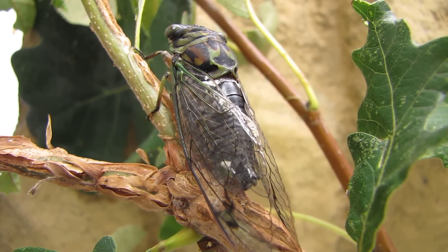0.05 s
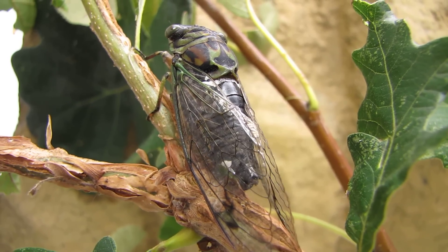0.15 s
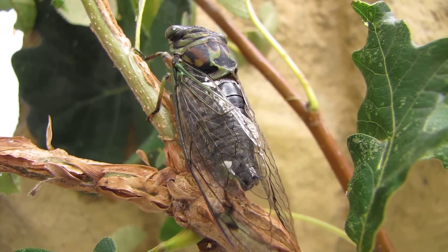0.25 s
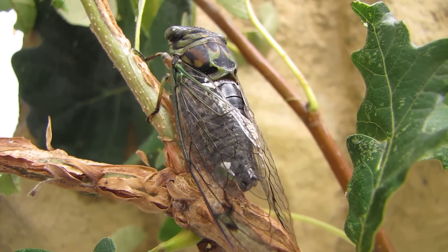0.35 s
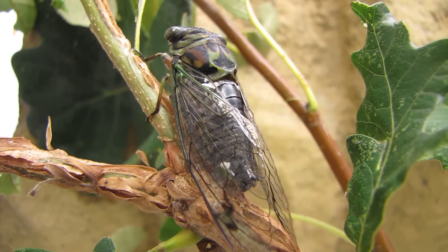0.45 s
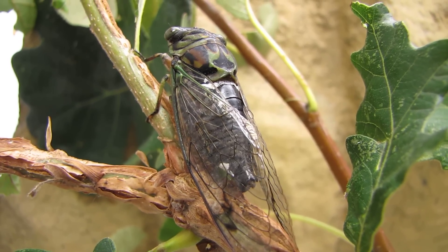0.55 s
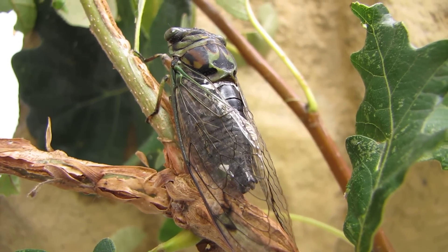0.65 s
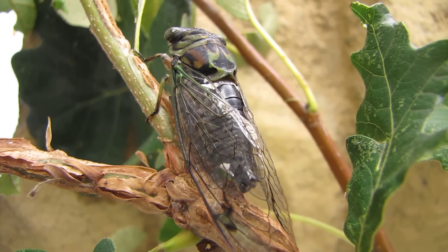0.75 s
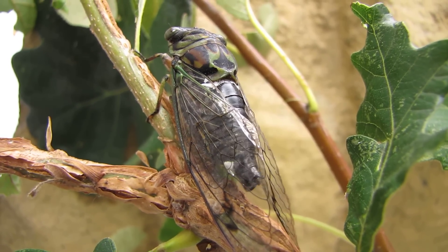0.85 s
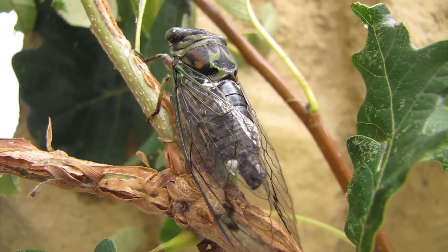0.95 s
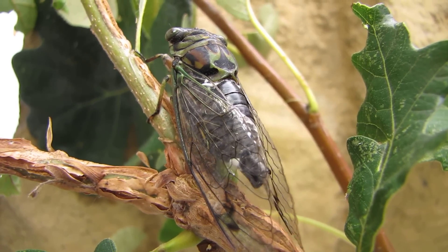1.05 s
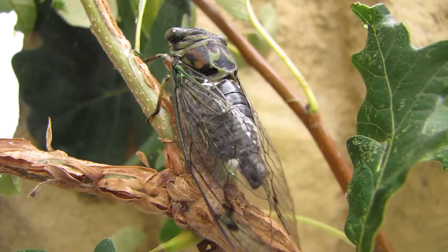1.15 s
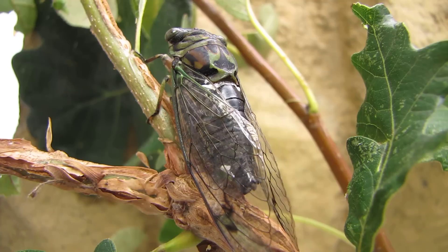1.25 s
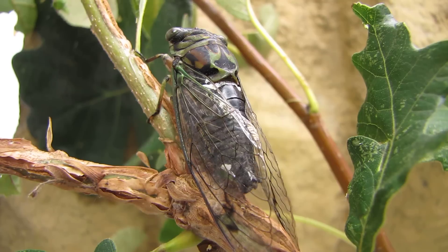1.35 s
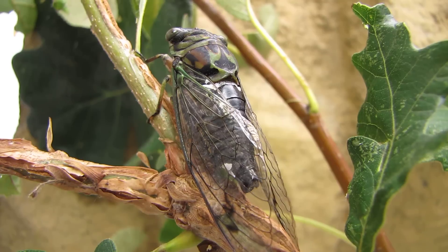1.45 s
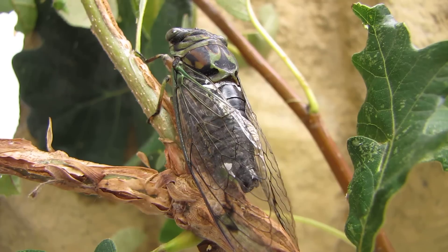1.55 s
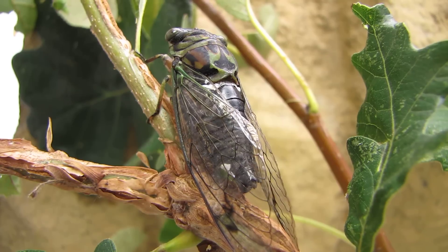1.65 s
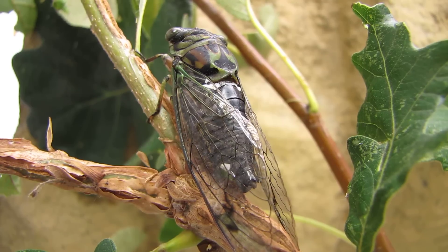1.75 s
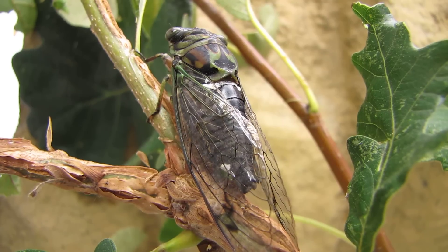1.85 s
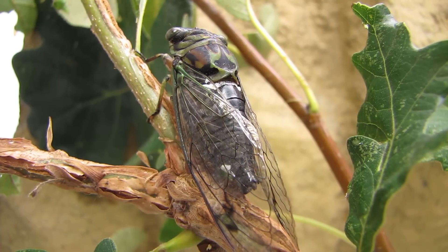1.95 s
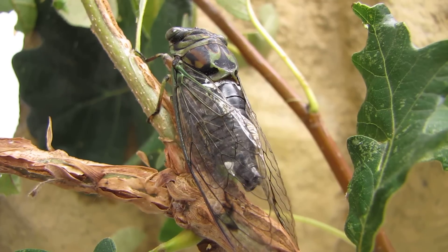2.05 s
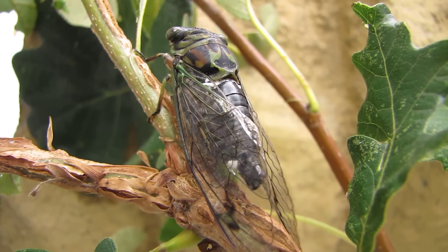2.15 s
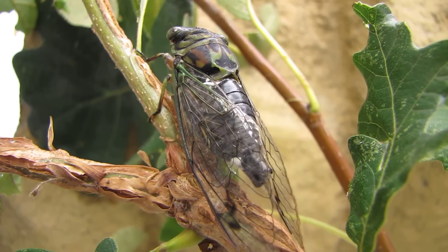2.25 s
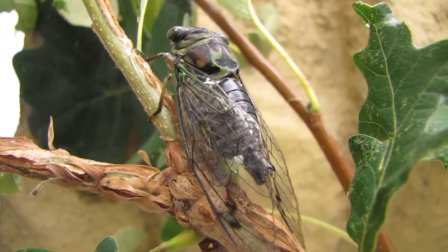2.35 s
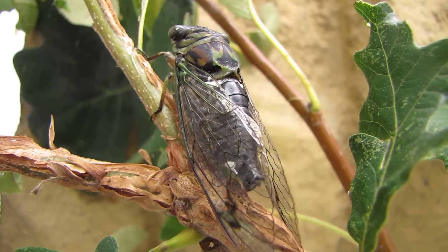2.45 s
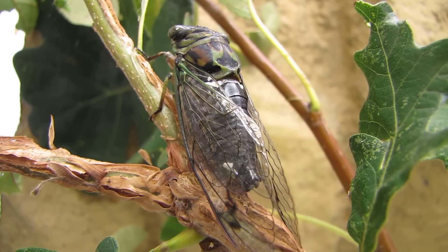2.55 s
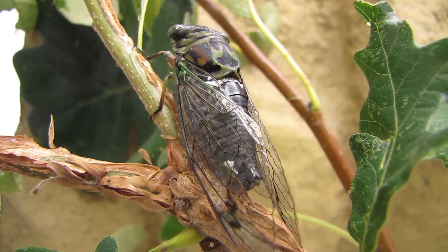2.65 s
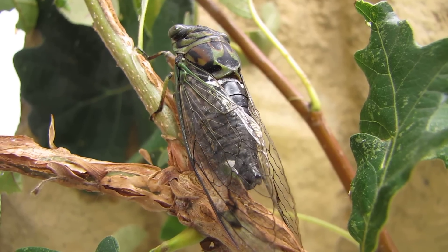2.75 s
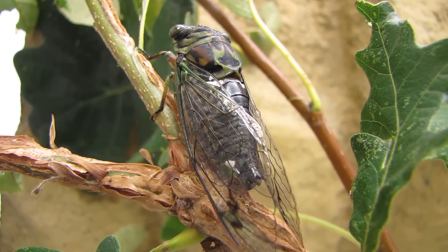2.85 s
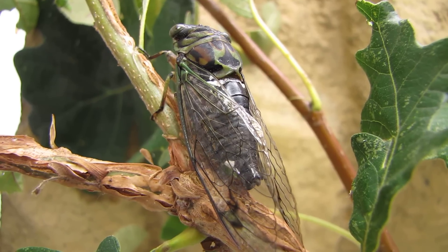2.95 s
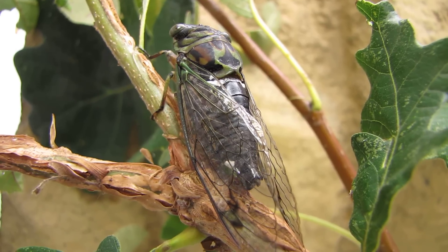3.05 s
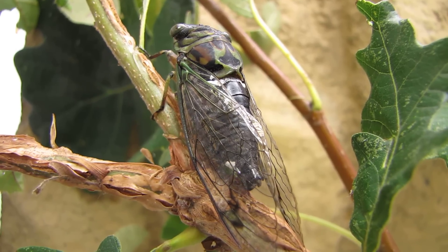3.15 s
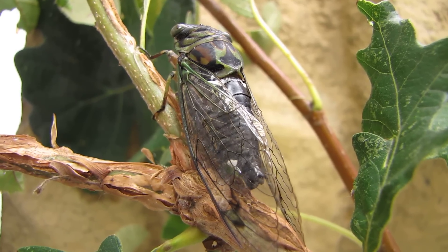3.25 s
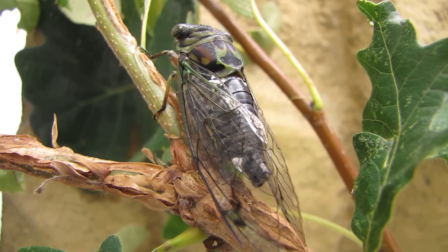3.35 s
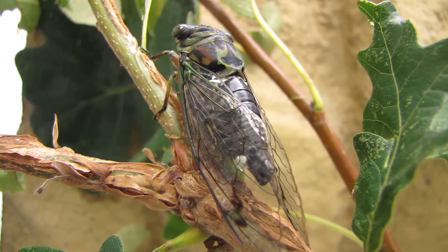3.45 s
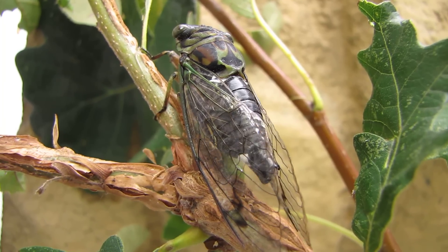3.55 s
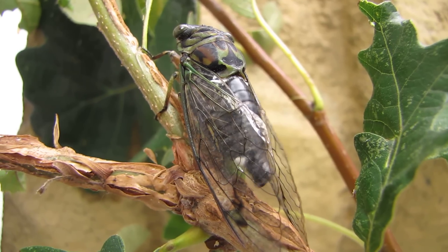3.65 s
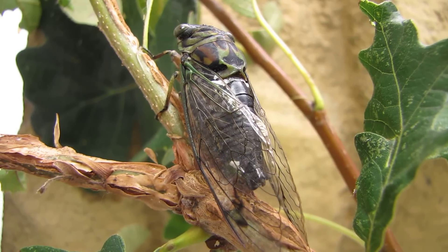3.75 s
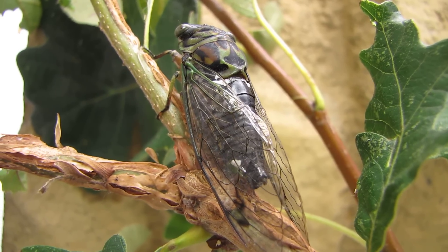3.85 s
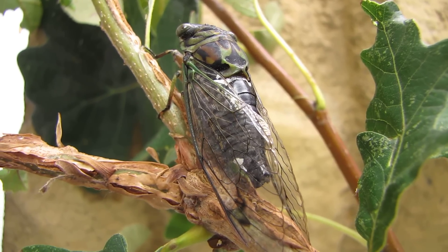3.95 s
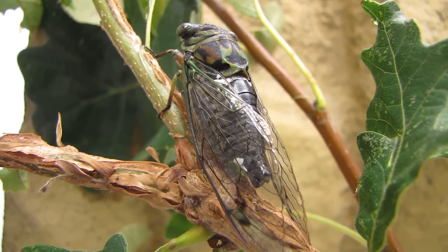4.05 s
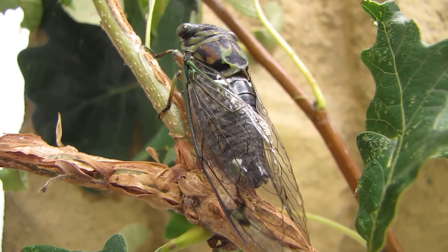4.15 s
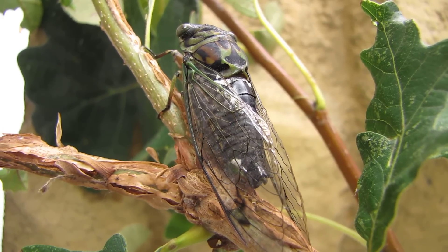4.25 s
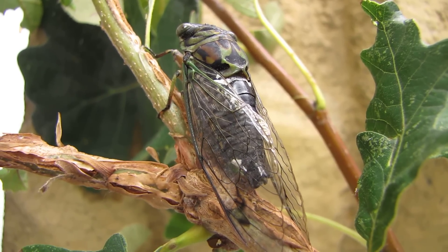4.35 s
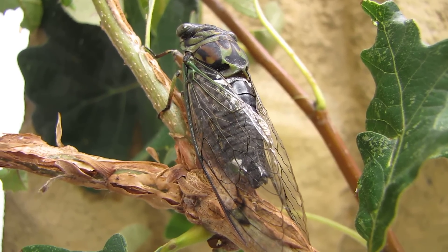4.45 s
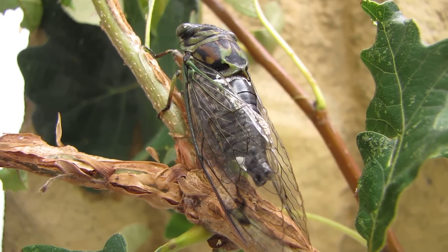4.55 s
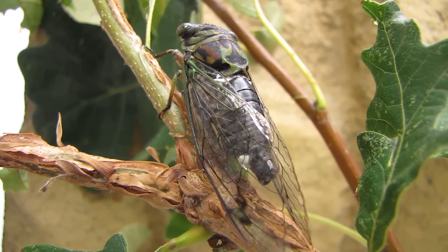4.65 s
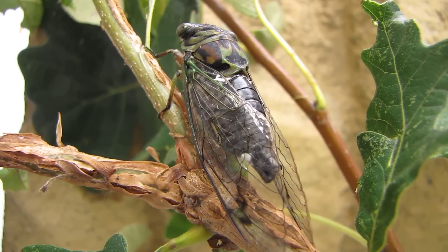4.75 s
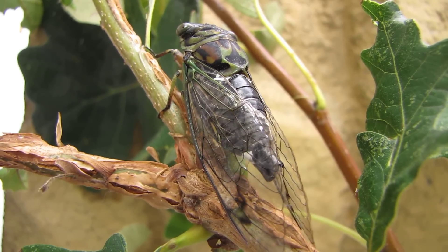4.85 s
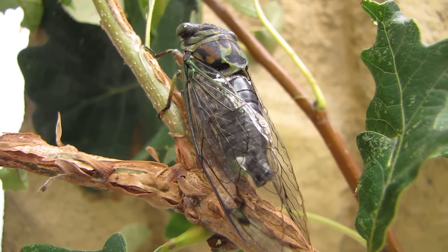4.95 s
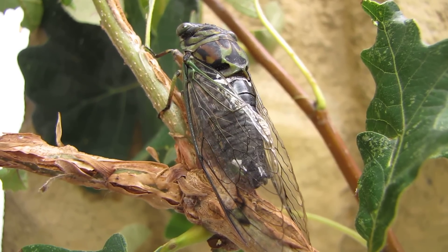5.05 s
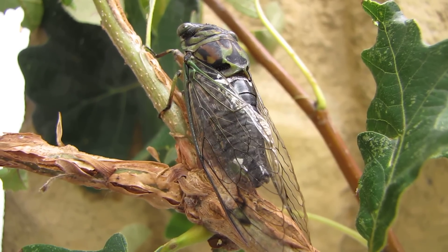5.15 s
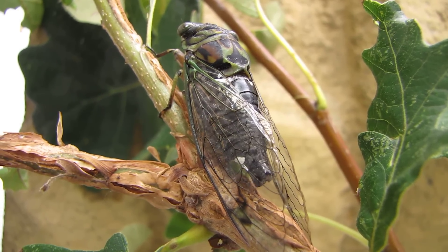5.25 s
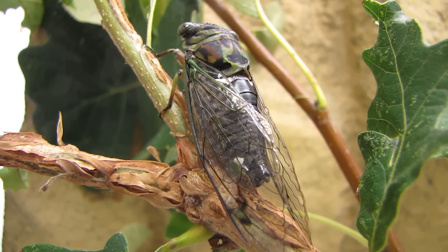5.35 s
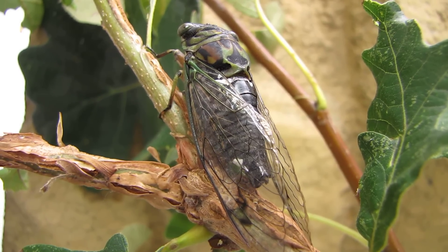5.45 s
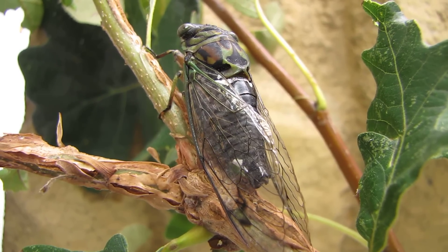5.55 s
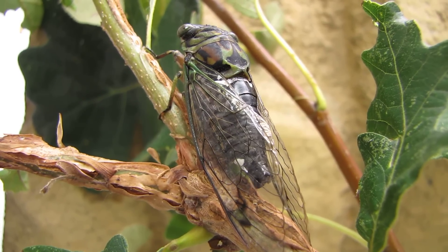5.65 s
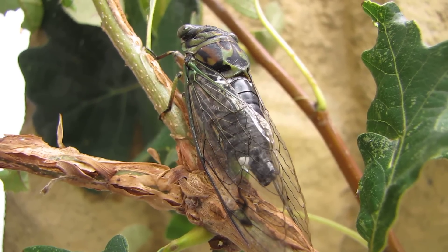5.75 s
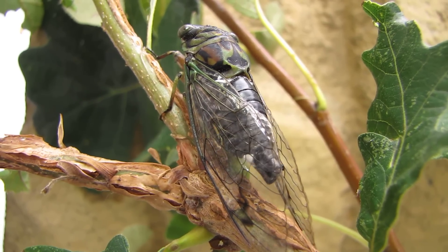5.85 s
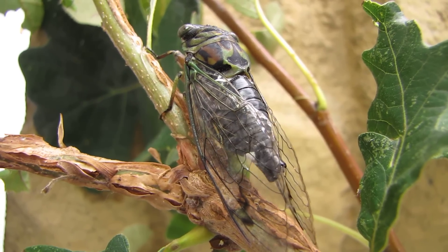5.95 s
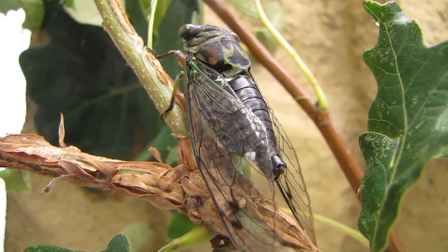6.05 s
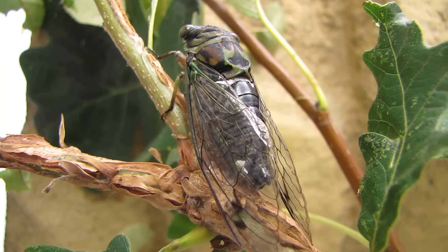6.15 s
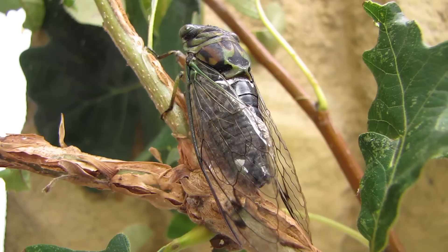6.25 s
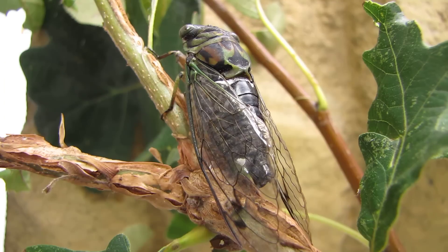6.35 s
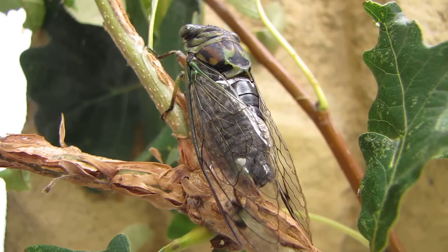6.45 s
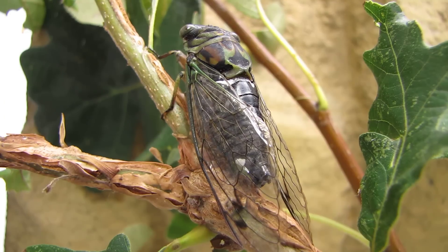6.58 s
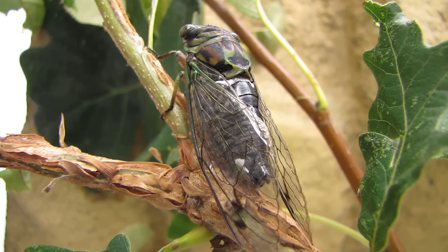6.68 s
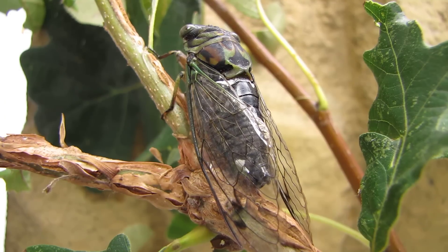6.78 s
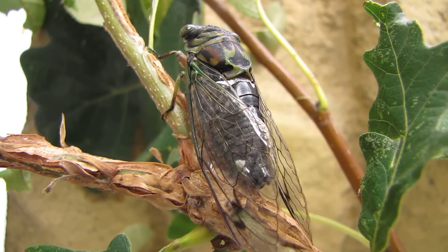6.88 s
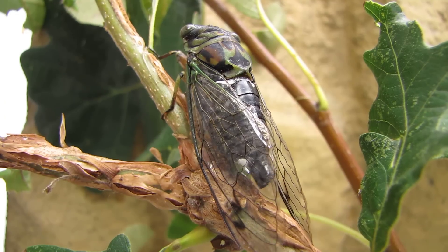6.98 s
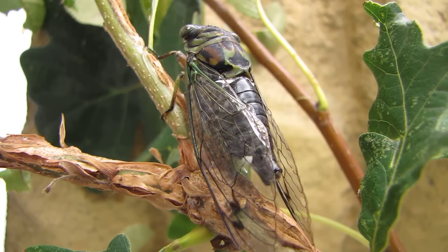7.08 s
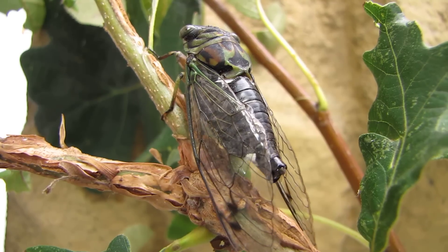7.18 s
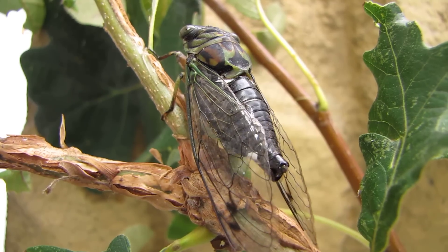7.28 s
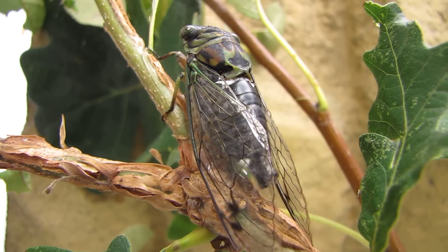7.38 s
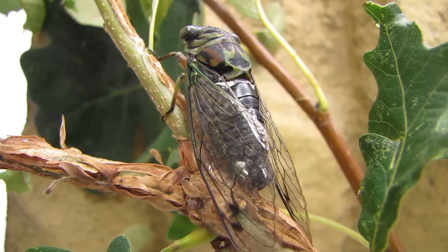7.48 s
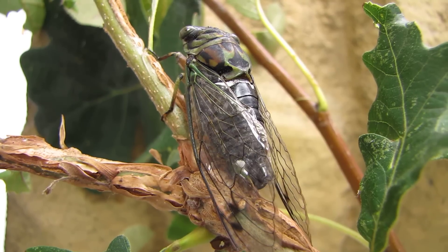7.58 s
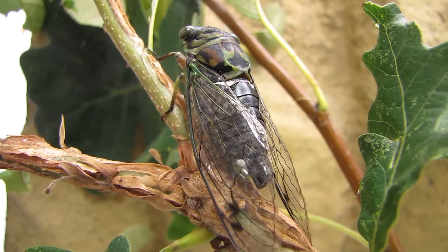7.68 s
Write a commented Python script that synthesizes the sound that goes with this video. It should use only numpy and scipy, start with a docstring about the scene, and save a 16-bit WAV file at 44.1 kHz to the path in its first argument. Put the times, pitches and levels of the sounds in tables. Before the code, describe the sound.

A very close cicada outdoors, bright, dry and slightly overloaded at its loudest. At 0 seconds the last ticks of an earlier phrase fade within about 0.2 seconds; near-quiet follows, with faint low rumble, thin air and a soft rustle around 0.5. Six phrases then start near 0.54, 1.8, 3.0, 4.3, 5.4 and 6.7 seconds. Each opens with one to three small ticks and a thin, creaky sizzle, leaps in loudness after about 0.25 seconds, and grows into a piercing buzz, strongest around 4 to 9 kilohertz, pulsing roughly 70 to 80 times a second. The buzz breaks off near 1.23, 2.45, 3.7, 5.0, 6.1 and 7.4, into six to eight slower ticks, about 40 per second, rapidly weakening. Between phrases, barely audible distant dove coos come near 1.4, 2.8, 4.2 and 6.3, with tiny rising bird squeals near 1.4, 2.6, 4.0 and 6.6.

```python
"""Close cicada in a garden

A cicada on a twig sings six phrases after the last ticks of an earlier one, overloading a very close microphone
a little. Clicks stand for the snaps of its ribbed drum skins (tymbals); they ring its air sac and add a dry
rasp. Each phrase starts as a thin sizzle, swells as the lifted abdomen opens the air sac, then breaks into
slower, fading ticks. Far behind, gliding tones make a dove and another bird; filtered noise makes a low rumble,
faint air, soft rustles and a faint tick."""
import sys
import numpy as np
from scipy import signal
from scipy.fft import rfft, irfft, next_fast_len
from scipy.io import wavfile

SR = 44100
rng = np.random.default_rng(int(sys.argv[2]) if len(sys.argv) > 2 else 0)


def generate_wav(signal):
    """Clip the signal to [-1, 1] and save it as 16-bit WAV at the path in sys.argv[1]."""
    frames = np.transpose(np.atleast_2d(signal))
    scaled = np.clip(frames, -1, 1) * 32767
    pcm = np.round(scaled).astype(np.int16)
    wavfile.write(sys.argv[1], SR, pcm)


N = 340452
TIME = np.arange(N) / SR   # seconds

# In all tone-colour tables the levels are relative: only the shape of the outline counts.
# outdoor rumble, tone colour: (frequency [Hz], level [dB])
RUMBLE_COLOUR = [(20, -0.5), (45, -4), (75, -1.5), (150, -1), (210, -9.5), (252, 5.5), (290, -5.5),
                 (355, -12.5), (420, -24.5), (900, -55.5)]
# faint outdoor air, tone colour: (frequency [Hz], level [dB])
AIR_COLOUR = [(250, -12), (450, -2), (750, -5.5), (1050, -2), (1500, -12), (3400, -11.5), (4800, -17),
              (8000, -21), (16000, -29)]
# soft rustles, and one brief tick at 5.34 s: (middle [s], half length [s], level [dB])
RUSTLES = [(0.536, 0.087, -54), (5.338, .007, -65)]
# rustles, tone colour: (frequency [Hz], level [dB])
RUSTLE_COLOUR = [(300, -38), (520, -2), (660, 9), (900, 2), (1500, 0), (2400, -8), (4000, -35), (9000, -38)]
# far dove's coos: (start [s], length [s], pitch [Hz], level [dB])
COOS = [(-.1, 0.38, 640, -79), (1.33, 0.42, 630, -81), (2.76, .42, 630, -79), (4.19, 0.42, 625, -79),
        (6.3, 0.12, 600, -76)]
# far bird's rising squeals: (start [s], length [s], pitch [Hz], level [dB])
SQUEALS = [(1.39, 0.15, 2100, -71), (1.44, .09, 2600, -74), (2.63, .09, 3100, -79), (3.89, .1, 3050, -80),
           (4.14, 0.15, 2080, -73), (4.17, .12, 2520, -72), (6.52, 0.18, 1980, -73), (6.6, .08, 2550, -78)]
# cicada phrases: (first tick [s], buzz starts [s], abdomen is up [s], buzz breaks [s],
#   starting level [dB, relative], release [s], opening ticks [count], closing ticks [count],
#   gap after the first closing tick [s])
PHRASES = [(-.73, -.72, -.43, -.043, -42, .03, 1, 7, .025),
           (.537, .548, .842, 1.229, -40, .026, 1, 7, .019),
           (1.771, 1.805, 2.08, 2.455, -40.5, .028, 3, 8, .018),
           (3.003, 3.042, 3.332, 3.715, -43.3, .036, 3, 6, .022),
           (4.277, 4.297, 4.576, 4.992, -39.5, .032, 1, 7, .022),
           (5.423, 5.446, 5.717, 6.132, -40.5, .03, 1, 6, .024),
           (6.715, 6.725, 7.026, 7.434, -45.5, .066, 1, 6, .023)]
# ribs buckling in one contraction of the buzz, with the abdomen fully lifted:
#   (place in the cycle [0-1], level [dB, relative], shrillness [0-1])
BUZZ_RIBS = [(0, 0, .1), (.12, -1.5, .1), (.25, -2.5, .4), (.39, -4, .3), (.53, -6.5, .7), (.66, -7, .9),
             (.79, -12.5, .8)]
# ribs buckling in a single tick: (delay [s], level [dB, relative], shrillness [0-1])
TICK_RIBS = [(0, 3, 0.4), (.0013, -1.5, 0.28), (.0027, -5, 0.9)]
# tone colour of a deep snap: (frequency [Hz], level [dB])
DEEP_COLOUR = [(1000, -8.5), (3000, 2), (4000, 2), (6000, 1.5), (7500, -1), (9000, -1), (12000, -21)]
# tone colour of a shrill snap: (frequency [Hz], level [dB])
SHRILL_COLOUR = [(1000, -25.5), (3900, -7), (4600, 1), (5150, 4), (6000, -1), (7300, 4), (9000, 2),
                 (12000, -11)]
# resonances of the air sac and body:
#   (frequency [Hz], width [Hz], level [dB, relative], left above right [dB])
BODY_MODES = [(3687, 277, -17.6, 2.4), (3862, 97, -8.2, -5.1), (4000, 129, -7.2, 1.9),
              (4160, 165, -5.4, 5.1), (4353, 125, -8, 3.5), (4630, 150, -8, -5.4), (4881, 121, -9.8, -6.8),
              (5170, 194, -6.4, -1.0), (5479, 102, -8.8, 3.6), (5672, 117, -5.8, -1.0),
              (5930, 150, -1.2, 1.0), (6074, 168, 1.0, -2.5), (6549, 195, -10.1, -1.0),
              (6720, 106, -11.5, 4.6), (6933, 133, -7.4, 1.3), (7166, 128, -4.7, -1.3),
              (7471, 83, -8.2, -0.5), (7575, 98, -4.6, -2.4), (7731, 163, -16.5, 26.0),
              (8178, 213, -10.5, 9.1), (8548, 308, -3.8, -5.4), (8597, 145, -0.8, -3.6),
              (8875, 115, -13.8, 8.8), (9327, 245, -14.5, 2.8)]
# dry rasp of the ribs, tone colour: (frequency [Hz], level [dB])
RASP_COLOUR = [(400, -48), (900, -27), (1500, -20.5), (2400, -14), (2900, -11), (4250, -14), (4650, -4.5),
               (6000, 2), (7800, -1.5), (8700, 1.5), (9900, -7.5), (11600, -2.5), (13000, -8), (15800, -19)]
# creak of the tymbal as it takes up tension, tone colour: (frequency [Hz], level [dB])
CREAK_COLOUR = [(500, -36), (1000, -15), (1450, -7), (1700, 3), (2000, -2), (2350, 0), (3000, -3),
                (4500, -22)]
# how far the left microphone opening (port) leads the right: (frequency [Hz], phase [rad])
PORT_LEAD = [(3700, -1), (4150, 2.27), (4600, 0.35), (5000, 2.02), (5400, -2.35), (5750, -0.83),
             (6000, -1.47), (6500, -1.5), (7100, -0.05), (7600, -2.48), (8200, -4.5), (8600, -1.5),
             (9500, -1), (12000, -1.3)]

# The song levels below are relative; the air sac, rasp and tick gains come on top.
CLOSED_DB, OPEN_DB = -42.5, -12.5   # song level with the abdomen down and lifted
# every phrase creeps up, leaps as the abdomen lifts, grows to its crest, holds and lets go
CREEP_DB, LIFTED_DB, CREST_DB, RELEASED_DB = -32.5, -14.8, -8.5, -20
LIFT_S, GROW_S = .1, .21
PAUSE_S = .005   # between the buzz and its first closing tick
# the tymbal muscles start fast, are slowed by the lift, then regain speed (contractions per second)
START_PACE_HZ, LADEN_PACE_HZ, FULL_PACE_HZ = 103, 69.5, 82.3
LADEN_LEAD_S, REGAIN_S = .07, .26   # slowest this long before the abdomen is up; recovered this long after
SAG_HZ_PER_S = 18   # and they tire from then on
PACE_WAVER_HZ, WAVERS_PER_S = 1.4, 40
# closing ticks get weaker one by one, down to the level of a bare tymbal
TICK_GAP_S = .025   # even spacing after the first gap
FIRST_TICK_DB, TICK_LOSS_DB, BARE_TICK_DB = -12.7, 3.6, -28.5
LAST_TICK_EXTRA_DB = 1.2   # the tymbal settles with a firmer snap
OPENING_TICK_DB = 7.5   # above the phrase's starting level


def from_db(db):
    """Turn decibels into a plain multiplying factor."""
    return 10 ** (np.asarray(db) / 20)


def rms_one(x):
    """Scale to an average strength (rms) of one."""
    return x / np.sqrt(np.mean(x ** 2) + 1e-20)


def coloured(x, points):
    """Filter to a tone colour without pre-echo (minimum phase); white noise keeps its power."""
    hz, db = np.transpose(points)
    bins = np.maximum(np.abs(np.fft.fftfreq(4096, 1 / SR)), 1)
    gain = rms_one(from_db(np.interp(np.log(bins), np.log(hz), db)))
    spectrum = np.exp(np.conj(signal.hilbert(np.log(gain))))
    response = np.fft.ifft(spectrum).real[:2048]
    return signal.oaconvolve(x, np.array(response, ndmin=x.ndim), axes=-1)[..., :N]


def wander(per_s):
    """A random line around zero, with a typical size near one, through per_s new points a second."""
    knots = rng.standard_normal(4000)
    return np.interp(TIME * per_s, np.arange(len(knots)), knots)


def clicks(times, heights):
    """A train of single-sample clicks."""
    heard = (times >= 0) & (times < N / SR)
    return np.bincount((times[heard] * SR).astype(int), heights[heard], N)


def fading(energy, t60):
    """Spread each click's energy over a tail that falls by 60 dB in t60 seconds."""
    r = from_db(-120 / (t60 * SR))   # energy, so twice the decibels
    return signal.lfilter([1 - r], [1, -r], energy + 1e-22)


def rumble(level_db=-63.8):
    """Low outdoor rumble: separate filtered noise on left and right."""
    return from_db(level_db) * coloured(rng.standard_normal((2, N)), RUMBLE_COLOUR)


def air(level_db=-78):
    """Faint outdoor air: separate filtered noise on left and right."""
    return from_db(level_db) * coloured(rng.standard_normal((2, N)), AIR_COLOUR)


def rustles():
    """Soft rustles: filtered noise that swells and dies away smoothly; the shortest row makes a brief tick."""
    stir = sum(from_db(db) * np.exp(-((TIME - middle) / half) ** 2) for middle, half, db in RUSTLES)
    return stir * coloured(rng.standard_normal((2, N)), RUSTLE_COLOUR)


def far_notes(notes, glide, arch, waver, octave_db):
    """Distant bird notes: a gliding, arched tone and its octave, blurred on the way to each port."""
    out = np.zeros((2, N))
    blur = 1 + waver * np.array([wander(400), wander(400)])
    for start, length, hz, db in notes:
        on = (TIME > start) & (TIME < start + length)
        u = (TIME[on] - start) / length   # 0-1 through the note
        pitch = hz * (1 + glide * (u - .5) - arch * (u - .5) ** 2) * blur[:, on]
        phase = 2 * np.pi * np.cumsum(pitch, axis=1) / SR
        tone = np.sin(phase) + from_db(octave_db) * np.sin(2 * phase)
        out[:, on] += from_db(db) * np.sqrt(2 * np.sin(np.pi * u)) * tone
    return out


def dove():
    """Far coos: nearly pure, gently falling tones."""
    return far_notes(COOS, glide=-.12, arch=0.254, waver=0.005, octave_db=-31)


def squealing_bird():
    """Far squeals: rising, shaky tones with a strong octave."""
    return far_notes(SQUEALS, glide=.2, arch=.35, waver=.05, octave_db=-2)


def garden():
    """The quiet background: sounds from separate sources simply add up."""
    return rumble() + air() + rustles() + dove() + squealing_bird()


def foliage(x, direct=.6, likeness=0.45):
    """The direct sound plus a short, dense scatter off the twigs and leaves."""
    t = TIME[:2048]
    shared = rng.standard_normal(len(t))
    separate = rng.standard_normal((2, len(t)))
    echoes = np.sqrt(likeness) * shared + np.sqrt(1 - likeness) * separate
    echoes = rms_one(echoes * from_db(-60 * t / .026)) / np.sqrt(len(t))   # falls by 60 dB in 26 ms
    return direct * x + signal.oaconvolve(x[None], echoes, axes=1)[:, :N]


def crumpled(snaps, share):
    """No two snaps are quite alike: each crumples for a moment, as a tiny burst of noise."""
    return snaps + share * np.sqrt(fading(snaps ** 2, .003)) * rng.standard_normal(N)


def opening(level_db):
    """How far the abdomen is lifted, 0-1: the more, the louder."""
    return np.clip((level_db - CLOSED_DB) / (OPEN_DB - CLOSED_DB), 0, 1)


def creak(snap_times, level_db=-54, t60=.6):
    """The first snaps of each buzz have a low, dry edge, as the tymbal takes up tension, that soon fades."""
    strain = sum((TIME > start) * from_db(-60 * np.abs(TIME - start) / t60) for _, start, *_ in PHRASES)
    snaps = crumpled(clicks(snap_times, np.ones(len(snap_times))), 2)
    return from_db(level_db) * strain * rms_one(coloured(foliage(snaps), CREAK_COLOUR))


def lone_contractions(uneven_db=0.5):
    """Muscle pulls outside the buzz, a few before and a dying run after: times and relative dB."""
    pulls = []
    for first, start, _, end, start_db, _, n_opening, n_closing, first_gap in PHRASES:
        for time in np.linspace(first, start, n_opening, endpoint=False):
            pulls.append((time, start_db + OPENING_TICK_DB))
        for k in range(n_closing):
            delay = first_gap + (k - 1) * TICK_GAP_S if k else 0
            settling_db = LAST_TICK_EXTRA_DB * (k == n_closing - 1)
            level_db = max(FIRST_TICK_DB - k * TICK_LOSS_DB, BARE_TICK_DB)
            pulls.append((end + delay, level_db + settling_db))
    at, level_db = np.transpose(pulls)
    return at, level_db + uneven_db * rng.standard_normal(len(at))


def ticks(gain_db=16, extra_opening_db=2, paired_above_db=-18, pair_lag_s=0.0068, pair_db=-1.5,
          jitter_s=.00008):
    """Rib snaps of lone contractions; in strong ones the second tymbal clearly follows the first."""
    at, level_db = lone_contractions()
    paired = 1 / (1 + from_db(6 * (paired_above_db - level_db)))   # 0-1, a soft threshold
    snaps = []
    for lag, gain in ((0, 1), (pair_lag_s, paired * from_db(pair_db))):
        for delay, rib_db, shrill in TICK_RIBS:
            late = jitter_s * rng.standard_normal(len(at))
            height = gain * from_db(level_db + rib_db + gain_db)
            shrillness = np.full(len(at), shrill)
            snaps.append([at + lag + delay + late, height, level_db + extra_opening_db, shrillness])
    return np.hstack(snaps)


def swell(t, start, up, end, start_db, release_s):
    """Relative dB of a phrase: creep, leap with the lifting abdomen, growth, hold, release."""
    rise = np.interp(t, [start, up - LIFT_S, up, up + GROW_S], [start_db, CREEP_DB, LIFTED_DB, CREST_DB])
    return rise + np.interp(t, [end - release_s, end], [0, RELEASED_DB - CREST_DB])


def muscle_pace(t, start, up):
    """Contractions per second: they slow under the lift, gather speed, then tire; never quite steady."""
    slowing = np.interp(t, [start, up - LADEN_LEAD_S], [START_PACE_HZ, LADEN_PACE_HZ])
    regained = np.clip((t - up + LADEN_LEAD_S) / (LADEN_LEAD_S + REGAIN_S), 0, 1) ** 2
    tiring = SAG_HZ_PER_S * np.maximum(t - up - REGAIN_S, 0)
    waver = PACE_WAVER_HZ * np.interp(t, TIME, wander(WAVERS_PER_S))
    return slowing + (FULL_PACE_HZ - LADEN_PACE_HZ) * regained - tiring + waver


def buzz(jitter_s=.00003, slack_jitter_s=0.00035, uneven_db=0.3, slack_contrast=.3):
    """Each muscle pull buckles a row of ribs: times, heights, relative dB and shrillness of the snaps."""
    share, rib_db, rib_shrill = np.transpose(BUZZ_RIBS)
    snaps = []
    for _, start, up, end, start_db, release_s, *_ in PHRASES:
        t = np.arange(start, end - PAUSE_S, 1 / SR)
        pace = muscle_pace(t, start, up)
        cycles = np.cumsum(pace) / SR
        due = np.arange(80)[:, None] + share   # in cycles; more than any phrase needs
        at = np.interp(due, cycles, t)
        level_db = swell(at, start, up, end, start_db, release_s)
        lifted = opening(level_db)
        late, strong = rng.standard_normal((2, *due.shape))
        # a slack tymbal buckles evenly, loosely and shrilly; a taut one in tight volleys, first ribs loudest
        contrast = slack_contrast + (1 - slack_contrast) * lifted
        weight = from_db(rib_db * contrast + uneven_db * strong)
        weight = weight / np.sqrt(np.sum(weight ** 2, axis=1, keepdims=True))
        # the square root keeps the power the same at any pace
        height = weight * from_db(level_db) * np.sqrt(SR / np.interp(at, t, pace))
        at = at + late * (jitter_s + slack_jitter_s * (1 - lifted) ** 2)
        shrill = 1 - lifted * (1 - rib_shrill)
        snaps.append(np.array([at, height, level_db, shrill])[:, due < cycles[-1]])
    return np.hstack(snaps)


def body(drive):
    """Air sac and body ring at many pitches, with alternating sign, each uneven to left and right."""
    knock, response = signal.unit_impulse(2048), 0
    for k, (hz, width, db, pan_db) in enumerate(BODY_MODES):
        r = np.exp(-np.pi * width / SR)   # a narrower resonance rings longer
        feedback = [1, -2 * r * np.cos(2 * np.pi * hz / SR), r * r]
        mode = signal.lfilter([1, 0, -1], feedback, knock) * (1 - r * r) / 2
        response = response + (-1) ** k * mode * from_db(db + pan_db * np.array([[.5], [-.5]]))
    response = response / np.sqrt(np.sum(response ** 2))
    return signal.oaconvolve(drive[None], response, axes=1)[:, :N]


def ports(x):
    """So near a source reaches the two ports with a phase that differs from band to band."""
    size = next_fast_len(N + 4096)
    lead = np.interp(np.fft.rfftfreq(size, 1 / SR), *np.transpose(PORT_LEAD))
    turn = np.exp(1j * lead * np.array([[.5], [-.5]]))   # half of it on each side
    return irfft(rfft(x, size) * turn, size)[:, :N]


def cicada(sac_closed_db=-13, sac_open_db=-1.0, rasp_closed_db=-3, rasp_open_db=-17.5,
           sac_crumple=0.2, rasp_crumple=1.0, sizzle_db=-4, scatter_db=-14):
    """Every rib snap rings the air sac and adds a dry rasp; the foliage scatters both."""
    at, height, level_db, shrill = np.hstack([buzz(), ticks()])
    lifted = opening(level_db)
    push = height * from_db(sac_closed_db + (sac_open_db - sac_closed_db) * np.sqrt(lifted))
    deep = coloured(crumpled(clicks(at, push * (1 - shrill)), sac_crumple), DEEP_COLOUR)
    sharp = coloured(crumpled(clicks(at, push * shrill), sac_crumple), SHRILL_COLOUR)
    sac = body(deep + sharp)
    scatter = from_db(scatter_db) * foliage(sac.mean(axis=0), direct=0, likeness=0)
    dry_snaps = clicks(at, height * from_db(rasp_closed_db + (rasp_open_db - rasp_closed_db) * lifted))
    # a slack membrane also crinkles finely between its snaps: a smooth sizzle
    crinkle = fading(clicks(at, height * (1 - lifted) ** 2) ** 2, .02)
    sizzle = from_db(sizzle_db) * np.sqrt(crinkle) * rng.standard_normal((2, N))
    rasp = coloured(foliage(crumpled(dry_snaps, rasp_crumple)) + sizzle, RASP_COLOUR)
    return sac + scatter + rasp + creak(at)


def scene():
    """The cicada in front of the garden."""
    return garden() + ports(cicada())


def record(dry, ceiling=0.46, hardness=9.0, dull_hz=14400, cutoff_hz=15650):
    """The overloaded input squashes the loudest peaks; the highest treble droops and the top is cut."""
    squashed = dry / (1 + np.abs(dry / ceiling) ** hardness) ** (1 / hardness)
    dulled = signal.sosfilt(signal.butter(2, dull_hz, fs=SR, output="sos"), squashed)
    return signal.sosfilt(signal.ellip(10, .1, 80, cutoff_hz, fs=SR, output="sos"), dulled)


dry = scene()
out = record(dry)
generate_wav(out)
```